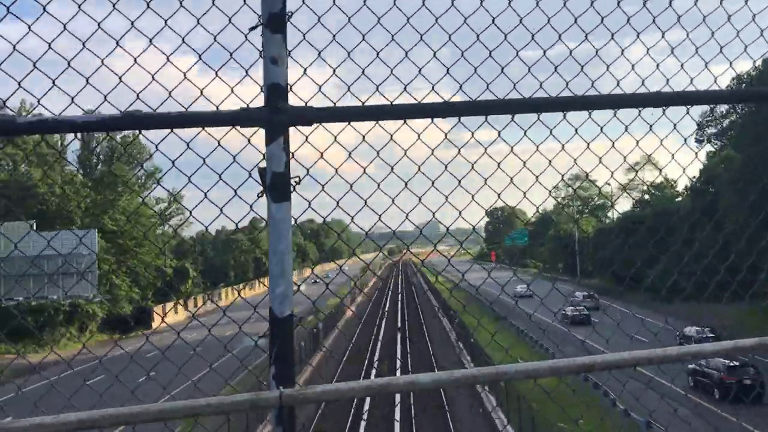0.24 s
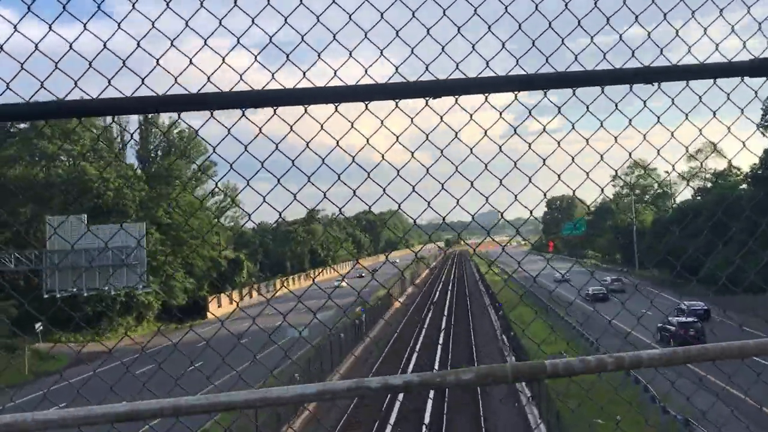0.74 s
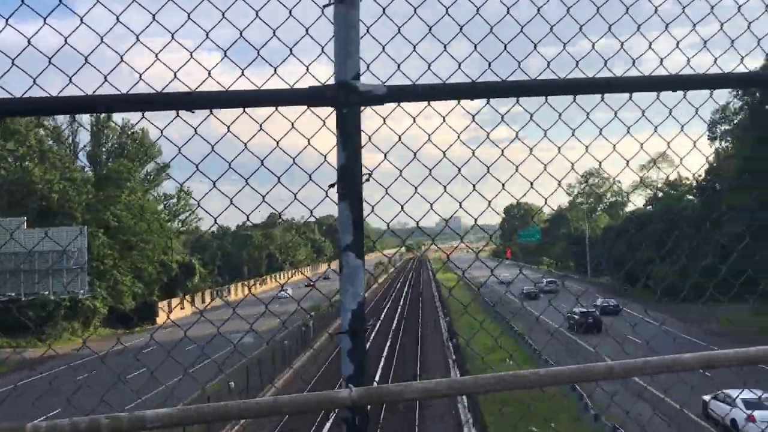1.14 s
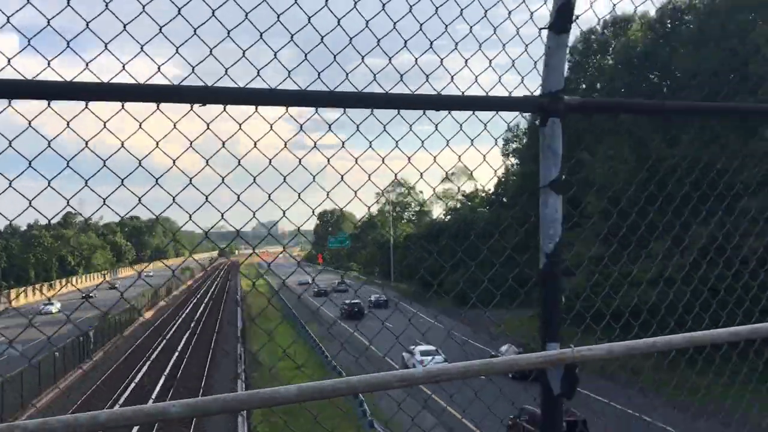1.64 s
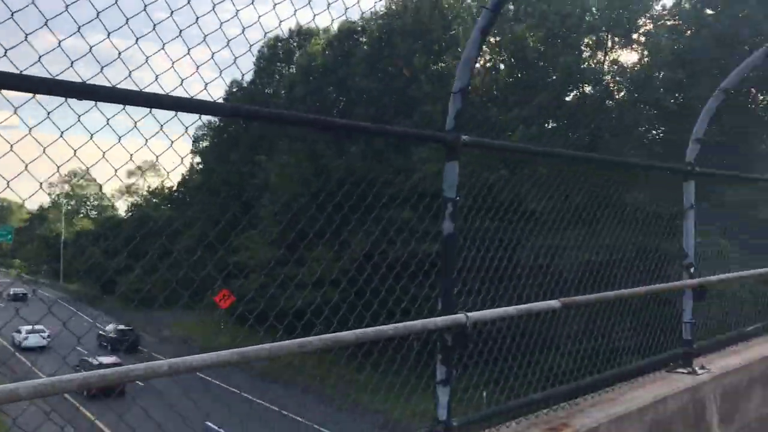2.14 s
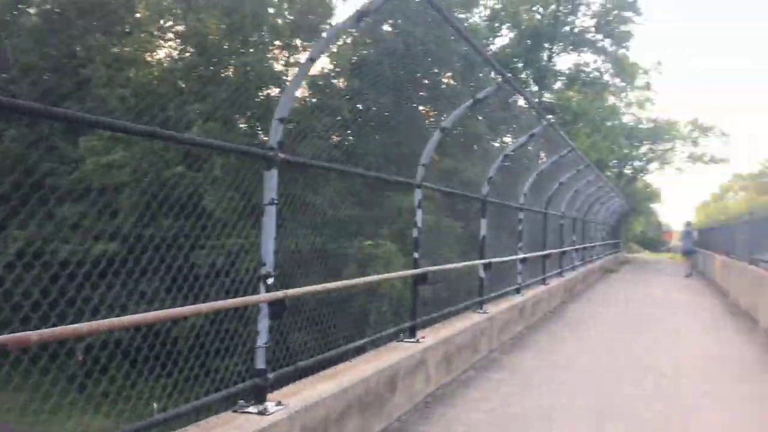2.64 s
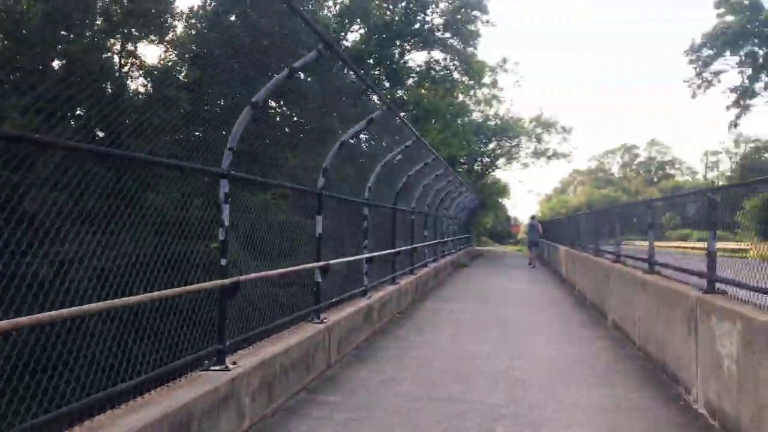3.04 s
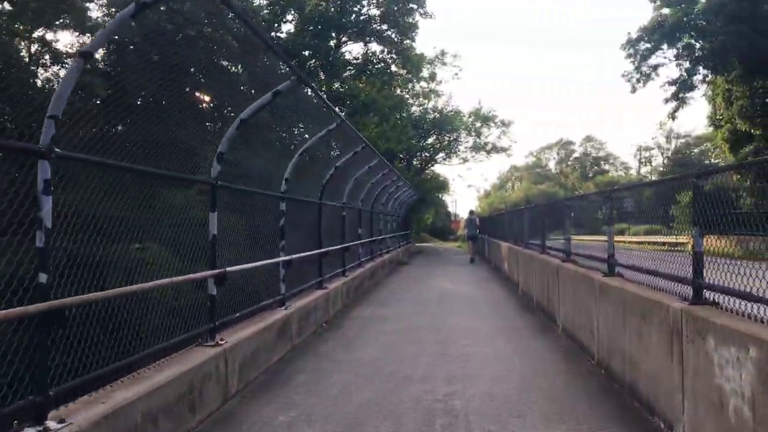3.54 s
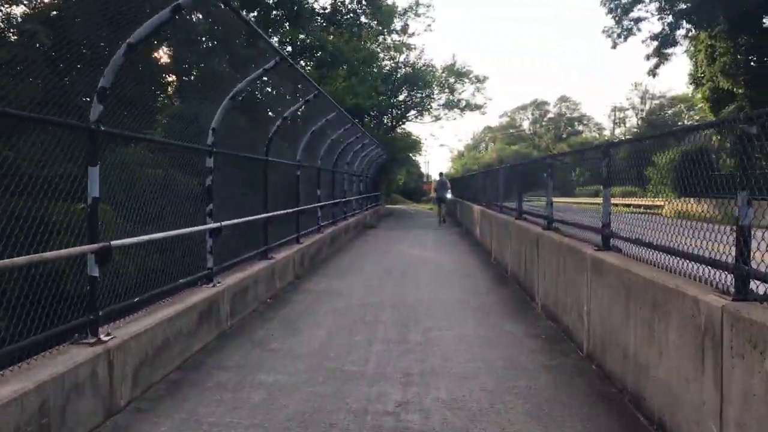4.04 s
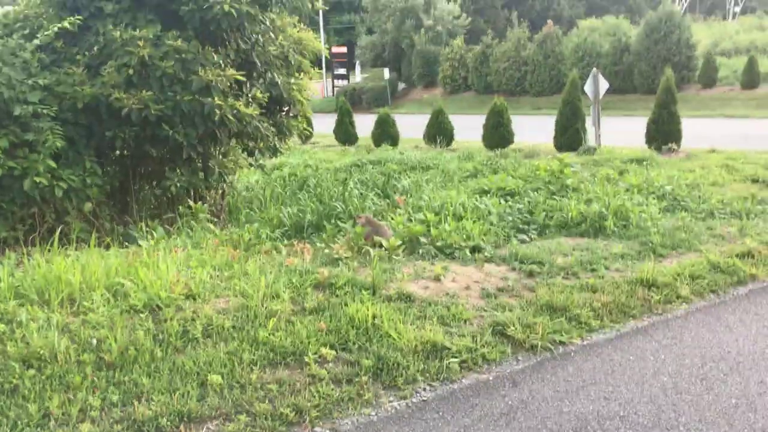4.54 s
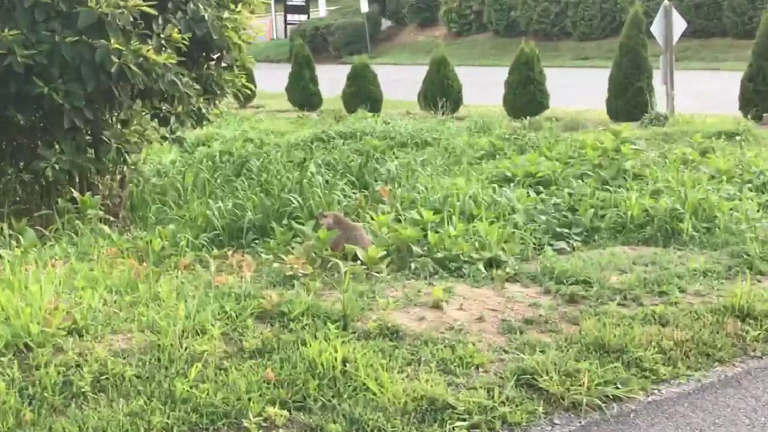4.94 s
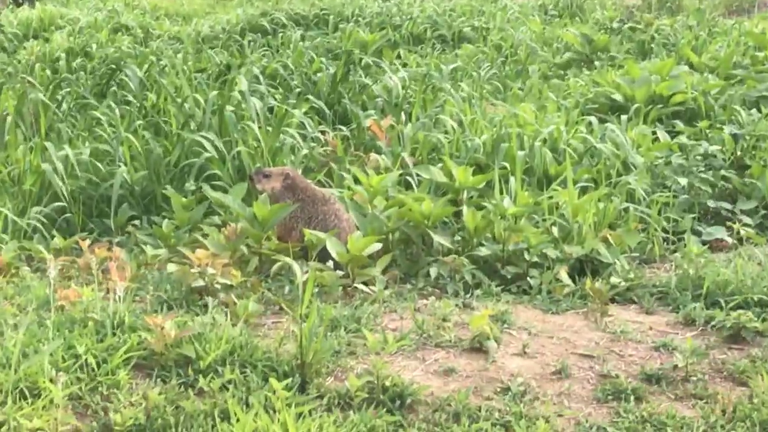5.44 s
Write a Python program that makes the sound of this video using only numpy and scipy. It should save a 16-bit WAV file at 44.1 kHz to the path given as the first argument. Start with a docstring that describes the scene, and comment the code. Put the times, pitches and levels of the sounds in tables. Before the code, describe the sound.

Gusty wind rumbles and thumps on a small microphone over the continuous roar and hiss of highway traffic beneath a footbridge. Midway, a passing vehicle adds a thin hiss, with several short swishes. The sound stops suddenly, and after a tiny gap comes a quiet roadside verge: far traffic and droning engines, soft rustling and crackling in the grass, a few ticks and faint microphone hiss.

```python
"""On a footbridge above a busy highway, a bicycle rider hears tyre roar and hiss from below.
Turbulent wind buffets a small microphone with rumble, flutter and thumps; brief swishes come
and go, and one vehicle hisses past. After a short gap a quiet grass verge fades in, with distant
traffic, low engine drones, a rustle, faint crackle, a few ticks and the microphone's own hiss."""
import sys
import numpy as np
from scipy import signal
from scipy.fft import rfft, irfft
from scipy.io import wavfile
from scipy.ndimage import uniform_filter1d

SR = 44100
rng = np.random.default_rng(int(sys.argv[2]) if len(sys.argv) > 2 else 0)


def log_audio(samples):
    """Write samples as a 16-bit WAV file to the path given in sys.argv[1]."""
    # one column per channel
    frames = np.atleast_2d(samples).T
    # limit to full scale, then quantise
    limited = np.clip(frames, -1, 1)
    pcm = np.round(limited * 32767).astype(np.int16)
    wavfile.write(sys.argv[1], SR, pcm)


N = 251370
T = np.arange(N) / SR
BRIDGE_END_S, VERGE_START_S, VERGE_FADE_S = 4.2295, 4.2765, 0.4
GUST_MEAN_DB = -34

# Traffic under the bridge: (time [s], roar level [dB], hiss level [dB])
TYRE_LEVELS = [(0, -28.5, -31.5), (.2, -26.5, -32), (.55, -27.5, -35), (1.0, -27.5, -34), (1.3, -27, -32),
               (1.55, -25, -32), (1.75, -27, -34), (2, -26, -34), (2.5, -26.5, -32.5), (2.9, -26, -33),
               (3.2, -24, -30.5), (3.5, -27, -32.5), (3.9, -26.5, -32), (4.23, -27.5, -34)]
# Spectra of tyre noise: (frequency [Hz], relative density [dB])
TYRE_ROAR_SPECTRUM = [(250, -42), (450, -12.5), (600, -7), (750, -3), (950, 1), (1150, -1.5), (1400, -1),
                      (1700, -4.5), (2100, -17), (3000, -53)]
TYRE_HISS_SPECTRUM = [(800, -35), (1800, 4), (2500, 1.5), (3300, -3), (4300, -5.5), (5500, -9), (8000, -16),
                      (12000, -27), (14000, -37), (16000, -43)]
# Gusts on the microphone: (time [s], flutter level [dB])
GUST_LEVELS = [(0, -40.5), (.2, -39), (.45, -30), (.57, -35), (.68, -30.5), (1.0, -29.5), (1.22, -36),
               (1.32, -29), (1.55, -35), (1.75, -32.5), (1.95, -37), (2.3, -30.5), (2.52, -37.5),
               (2.7, -34.5), (2.95, -39.5), (3.4, -35.5), (3.7, -35), (4.0, -36.5), (4.23, -38.5)]
# Spectra of turbulence: (frequency [Hz], relative density [dB])
WIND_RUMBLE_SPECTRUM = [(15, -45), (30, 2), (45, 9.5), (62, 10), (85, 9.5), (120, -7), (200, -39)]
WIND_FLUTTER_SPECTRUM = [(50, -43), (90, 2), (130, -2), (200, -6.5), (300, -12), (450, -14), (800, -42)]
# The strongest eddies: (time [s], peak level [dB], frequency [Hz])
STRONG_EDDIES = [(0.258, -15.5, 102), (0.309, -20, 126), (0.332, -17.5, 368), (0.341, -16, 176),
                 (0.35, -21, 342), (0.42, -15.5, 148), (0.464, -9, 77.5), (0.499, -16, 316),
                 (0.505, -14, 176), (0.62, -19.5, 305), (0.692, -18.5, 74), (0.695, -23, 270),
                 (0.706, -19, 153), (0.746, -21, 151), (0.763, -22, 72), (0.893, -18, 155),
                 (0.906, -17, 59), (0.936, -18.5, 146), (0.979, -20, 367), (0.999, -22.5, 290),
                 (1.007, -22, 157), (1.054, -29, 73), (1.143, -25, 298), (1.146, -21.5, 143),
                 (1.287, -17, 410), (1.286, -17.5, 65), (1.293, -20.5, 162), (1.374, -20.5, 141),
                 (1.462, -25, 121), (1.707, -17, 74), (1.789, -23, 72), (2.101, -17.5, 80),
                 (2.139, -17, 71), (2.14, -20.5, 285), (2.206, -23, 140), (2.211, -23, 340),
                 (2.252, -20.5, 347), (2.277, -19, 65), (2.283, -21, 168), (2.31, -19, 232),
                 (2.34, -24, 163), (2.356, -21, 70), (2.444, -20, 110), (2.739, -22.5, 128),
                 (2.761, -20, 70), (3.113, -18, 70), (3.125, -21, 201), (3.333, -18.5, 132),
                 (3.398, -14, 66), (3.417, -20.5, 285), (3.417, -11, 136), (3.479, -15.5, 255),
                 (3.48, -9.5, 165), (3.488, -14.5, 68.4), (3.551, -16.5, 81.5), (3.628, -21, 66),
                 (3.742, -21, 75), (3.855, -18, 75), (3.915, -21.5, 182), (3.917, -24, 285)]
# Bursts of noise: (time [s], level [dB], centre [Hz], half-width [octaves], duration [ms])
SWISH_BURSTS = [(0.115, -46, 9500, .5, 110), (1.08, -43, 5950, 0.37, 170), (1.39, -49, 12000, .7, 30),
                (2.48, -48, 13000, .4, 50), (2.861, -34, 4380, 0.76, 34), (3.079, -33, 2580, .4, 40),
                (3.135, -25, 2500, 0.38, 58), (3.135, -34, 5370, 0.71, 32), (3.325, -36.5, 8600, 0.29, 46),
                (3.321, -36, 6200, 0.23, 55), (3.322, -50, 11500, .35, 40), (3.51, -30.5, 2620, 0.65, 26)]
# Air hiss of the passing vehicle: (centre [Hz], bandwidth [Hz], relative density [dB])
VEHICLE_BANDS = [(2360, 270, 15), (3800, 400, 7), (5340, 540, 2), (6600, 670, -5), (8800, 460, 0),
                 (8900, 1700, -0.5), (11400, 5000, -8)]
# Spectra of the distant road: (frequency [Hz], relative density [dB])
FAR_ROAR_SPECTRUM = [(250, -7.5), (480, -12.5), (750, -8), (930, -4), (1300, -8.5), (2000, -15.5),
                     (2500, -25.5), (4000, -46.5)]
FAR_RUMBLE_SPECTRUM = [(15, -43), (30, -20), (55, 5.5), (90, -10.5), (180, -3), (250, -12), (450, -21),
                       (700, -57)]
# Higher distant engines: (frequency [Hz], resonator bandwidth [Hz], level re road rumble [dB])
ENGINE_DRONES = [(113.5, 11, -4), (230.3, 5.6, -8)]
# Spectrum of the rustle on the verge: (frequency [Hz], relative density [dB])
RUSTLE_SPECTRUM = [(1500, -16), (2700, -2), (3500, 2), (4500, -5.5), (5500, -10), (8000, -16), (12000, -34)]
# Steps in the microphone's self-noise: (start time [s], level [dB])
SELF_NOISE_STEPS = [(4.277, -77), (4.416, -64.5), (4.62, -60.5), (5.048, -77)]
# Small ticks: (time [s], peak level [dB], frequency [Hz], time to decay by 60 dB [ms])
TICK_RINGS = [(4.377, -45, 10000, .8), (4.393, -45, 9000, .8), (4.752, -43, 2800, 24),
              (4.757, -26.5, 1800, 10)]
# Dips in the microphone port's response: (centre [Hz], half-width [Hz], gain [dB])
PORT_NOTCHES = [(4910, 310, -2.5), (5700, 110, -3), (7580, 760, -2.5), (10400, 460, -3.5),
                (15700, 1200, -3)]


def gain_of(db):
    """Amplitude ratio of a level in decibels."""
    return 10 ** (np.asarray(db) / 20)


def unit_rms(x):
    """Normalisation to an rms of 1."""
    return x / np.sqrt(np.mean(x ** 2) + 1e-20)


def spectrum(points):
    """Level as a function of frequency, interpolated on a logarithmic axis."""
    hz, db = np.transpose(points)
    return lambda f: np.interp(np.log(f + 1), np.log(hz + 1), db)


def level_at(rows, t=T, column=1):
    """Linear interpolation of one level column at the times t."""
    rows = np.array(rows)
    return np.interp(t, rows[:, 0], rows[:, column])


def octave_bell(f, centre_hz, octaves):
    """A Gaussian band on a logarithmic frequency axis."""
    return np.exp(-(np.log2(f / centre_hz) / octaves) ** 2)


def pulse(t, ms):
    """A Gaussian envelope, ms wide at half amplitude."""
    return np.exp(-2.8 * (t * 1000 / ms) ** 2)


def glide(t, start, end, mid_s, scale_s):
    """A logistic transition from start to end."""
    return start + (end - start) / (1 + np.exp((mid_s - t) / scale_s))


def fluctuation(samples):
    """Two moving averages reduce white noise to a slow random wander of rms 1."""
    return unit_rms(uniform_filter1d(uniform_filter1d(rng.standard_normal(N), samples), samples))


def add(mix, start_s, sound):
    """Superposition of a sound on the mix."""
    part = mix[round(start_s * SR):][:len(sound)]
    part += sound[:len(part)]


def noise(shape_db, band_hz, size=512, patchy_db=0., flicker_db=0., drift_db=None):
    """Random short-time spectra with local patches and shared flicker; rms about 1 in band_hz."""
    hop = size // 4
    frames, hz = N // hop + 5, np.fft.rfftfreq(size, 1 / SR)
    real, imag, patches = np.moveaxis(rng.standard_normal((frames, len(hz), 3)), 2, 0)
    patches = unit_rms(uniform_filter1d(uniform_filter1d(patches, size=24, axis=0), size=4, axis=1))
    flicker = unit_rms(uniform_filter1d(rng.standard_normal(frames), size=6))[:, None]
    shape = gain_of(shape_db(hz))
    db = patchy_db * patches + flicker_db * flicker
    if drift_db:
        frame_s = (np.arange(frames)[:, None] - 2) * hop / SR
        db = db + drift_db(frame_s, hz + 1)
    spectra = (real + 1j * imag) * shape * gain_of(db)
    wave = signal.istft(spectra.T, nperseg=size, noverlap=size - hop)[1][:N]
    inside = (hz >= band_hz[0]) & (hz <= band_hz[1])
    return unit_rms(wave) * np.sqrt(np.sum(shape ** 2) / np.sum(shape[inside] ** 2))


def highway_tyres():
    """Rolling tyres radiate broadband roar and hiss, whose spectra shift as cars come and go."""
    def roar_drift(t, f):
        hump_hz = glide(t, 856, 1250, mid_s=1.93, scale_s=0.09) + 120 * np.maximum(t - 1.93, 0)
        db_per_octave = glide(t, -2, 1.24, mid_s=1.17, scale_s=0.089)
        tilt_db = db_per_octave * np.clip(np.log2(f / 1150), -1.2, 1.2)
        return 1.5 * octave_bell(f, hump_hz, 0.12) + tilt_db

    def hiss_drift(t, f):
        band_hz = 4220 * 2 ** (-0.33 * np.maximum(t - 0.94, 0))  # holds, then slides down
        shelf_db = 2 + 0.5 * (t > 2.45) + 0.9 * np.interp(t, T, treble_flicker)
        return 3.5 * octave_bell(f, band_hz, 0.22) + shelf_db / (1 + (7000 / f) ** 6)

    treble_flicker = fluctuation(1500)
    roar = noise(spectrum(TYRE_ROAR_SPECTRUM), (600, 2000),
                 patchy_db=0.65, flicker_db=0.8, drift_db=roar_drift)
    hiss = noise(spectrum(TYRE_HISS_SPECTRUM), (2000, 7500), size=256,
                 patchy_db=0.76, flicker_db=0.1, drift_db=hiss_drift)
    return roar * gain_of(level_at(TYRE_LEVELS)) + hiss * gain_of(level_at(TYRE_LEVELS, column=2))


def wind_turbulence():
    """Turbulent pressure on the microphone: flutter follows the gusts fully, deep rumble weakly."""
    rumble = noise(spectrum(WIND_RUMBLE_SPECTRUM), (30, 90), size=4096)
    flutter = noise(spectrum(WIND_FLUTTER_SPECTRUM), (90, 450), size=2048)
    lumps = fluctuation(500)
    gust_db = level_at(GUST_LEVELS)
    rumble_db = -33 + 0.23 * (gust_db - GUST_MEAN_DB)
    return rumble * gain_of(rumble_db + 1.2 * lumps) + flutter * gain_of(gust_db + 1.8 * lumps)


def small_eddies(per_s=17, low_hz=80.4, high_hz=327):
    """Small eddies arrive at random and are stronger in gusts; rows as in STRONG_EDDIES."""
    when, pitch, size = rng.random((80, 3))[:round(per_s * BRIDGE_END_S)].T
    times = .1 + when * (BRIDGE_END_S - .1)
    db = -26.5 + 0.74 * (level_at(GUST_LEVELS, times) - GUST_MEAN_DB) + 4.4 * (size - .5)
    return list(zip(times, db, low_hz * (high_hz / low_hz) ** pitch))


def eddy_thumps():
    """Each eddy is a brief pressure oscillation, shorter when higher in pitch or stronger."""
    out, t = np.zeros(N), (np.arange(6000) - 3000) / SR
    for s, db, hz in small_eddies() + STRONG_EDDIES:
        phase, drift = rng.random(2)
        ms = 16.4 * (100 / hz) ** 0.75 * gain_of(-0.1 * (db + 20))
        bend = 1 + 0.57 * (drift - .5) * t * 1000 / ms  # the pitch drifts as the eddy rolls by
        swing = np.cos(2 * np.pi * (hz * t * bend + phase))
        add(out, s + t[0], gain_of(db) * swing * pulse(t, ms))
    return out


def swishes(size=8192):
    """Band-limited noise under a short Gaussian envelope is heard as a swish."""
    out, t = np.zeros(N), (np.arange(size) - size // 2) / SR
    f = np.fft.rfftfreq(size, 1 / SR)
    for s, db, hz, octaves, ms in SWISH_BURSTS:
        white = rfft(rng.standard_normal(size))
        band = unit_rms(irfft(white * octave_bell(f + 1, hz, octaves)))
        add(out, s + t[0], gain_of(db) * band * pulse(t, ms))
    return out


def passing_vehicle(start_s=2.42, rise_s=.2, end_s=3.42, fade_db_per_s=110):
    """Air hiss in incoherent bands, whose powers add; it swells slowly, then drops away."""
    def bands_db(f):
        power = sum(gain_of(db) ** 2 / (1 + (2 * (f - hz) / width) ** 4)
                    for hz, width, db in VEHICLE_BANDS)
        return 10 * np.log10(power)

    onset = np.clip((T - start_s) / rise_s, 0, 1)
    swell_db = 4.5 * (T - start_s) / (end_s - start_s)
    fade_db = fade_db_per_s * np.maximum(T - end_s, 0)
    hiss = noise(bands_db, (7500, 10500), size=256, patchy_db=0.9, flicker_db=1.2)
    return hiss * onset * gain_of(-49 + swell_db - fade_db)


def engine_drone(hz, width_hz):
    """Noise passed twice through a narrow resonance becomes a wavering tone."""
    pole = np.exp((-np.pi * width_hz + 2j * np.pi * hz) / SR)
    tone = rng.standard_normal(N)
    for _ in range(2):
        tone = signal.lfilter([1], [1, -pole], tone).real
    return unit_rms(tone)


def distant_road():
    """Far traffic is a superposition of broadband roar, low rumble and narrowband engine drones."""
    roar = noise(spectrum(FAR_ROAR_SPECTRUM), (500, 2300), flicker_db=0.5)
    rumble = noise(spectrum(FAR_RUMBLE_SPECTRUM), (90, 300), size=4096)
    engines = sum(gain_of(db) * engine_drone(hz, width) for hz, width, db in ENGINE_DRONES)
    return roar * gain_of(-40.5) + (rumble + engines) * gain_of(-41)


def rustle():
    """Random modulation of treble noise is heard as a rustle."""
    return noise(spectrum(RUSTLE_SPECTRUM), (2800, 4600), size=256, patchy_db=1.0, flicker_db=0.8)


def microphone_hiss():
    """Broadband self-noise of the microphone, stepping up and down in level."""
    hiss = noise(spectrum([(1500, 2), (5000, -2.5), (16000, -8.0)]), (5500, 15000),
                 size=256, flicker_db=0.5)
    steps_s, steps_db = np.transpose(SELF_NOISE_STEPS)
    step = np.maximum(np.searchsorted(steps_s, T) - 1, 0)
    return hiss * gain_of(uniform_filter1d(steps_db[step], size=400))


def grass_crackle(snaps_per_s=40):
    """Dry snaps in the grass are sparse random impulses; differencing favours their treble."""
    impulses = rng.standard_normal(N + 1) * (rng.random(N + 1) < snaps_per_s / SR)
    return gain_of(-46) * np.diff(impulses)


def ticks():
    """Each tick is a damped oscillation of a single mode."""
    out, t = np.zeros(N), np.arange(1400) / SR
    for s, db, hz, t60_ms in TICK_RINGS:
        add(out, s, gain_of(db - 60000 * t / t60_ms) * np.sin(2 * np.pi * hz * t))
    return out


def verge():
    """Ambient sound fades in beneath hiss and crackle; the rustle and deepest drone keep growing."""
    fade_db = -12.5 * np.clip(1 - (T - VERGE_START_S) / VERGE_FADE_S, 0, 1)
    growing_s = np.maximum(T - VERGE_START_S - VERGE_FADE_S, 0)
    ambience = distant_road() + rustle() * gain_of(-62 + 5.5 * growing_s)
    hiss_and_crackle = microphone_hiss() + grass_crackle()
    ambience += engine_drone(hz=66.2, width_hz=24) * gain_of(-39 + 3 * growing_s)
    return ambience * gain_of(fade_db) + hiss_and_crackle


def scene():
    """The bridge sounds stop abruptly in a faint exponential decay; the verge follows the gap."""
    vent = signal.butter(3, 36, "high", fs=SR, output="sos")  # the capsule vent leaks slow swings
    bridge = highway_tyres() + passing_vehicle() + swishes()
    bridge += signal.sosfilt(vent, wind_turbulence() + eddy_thumps())
    trail = bridge * gain_of(-23.5 - 790 * np.maximum(T - BRIDGE_END_S, 0))
    mix = np.where(T < BRIDGE_END_S, bridge, trail) + verge() * (T >= VERGE_START_S) + ticks()
    return mix[None]


def record(dry):
    """Linear filtering: the microphone port's shallow notches, then a low-pass band limit."""
    f = np.linspace(0, SR / 2, 1025)
    port_db = sum(db * np.exp(-((f - hz) / width) ** 2) for hz, width, db in PORT_NOTCHES)
    port = signal.firwin2(513, f, gain_of(port_db), fs=SR)
    low_pass = signal.firwin(1023, cutoff=15670, window=("kaiser", 9), fs=SR)
    notched = signal.oaconvolve(dry, port[None], "same")
    return signal.oaconvolve(notched, low_pass[None], "same")


dry = scene()
out = record(dry)
log_audio(out)
```